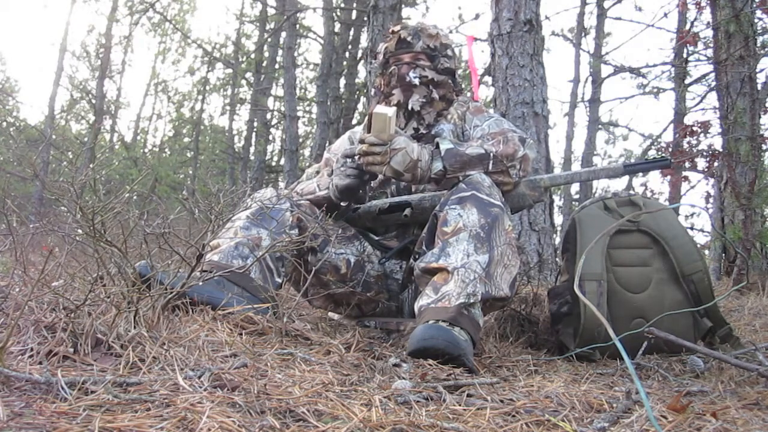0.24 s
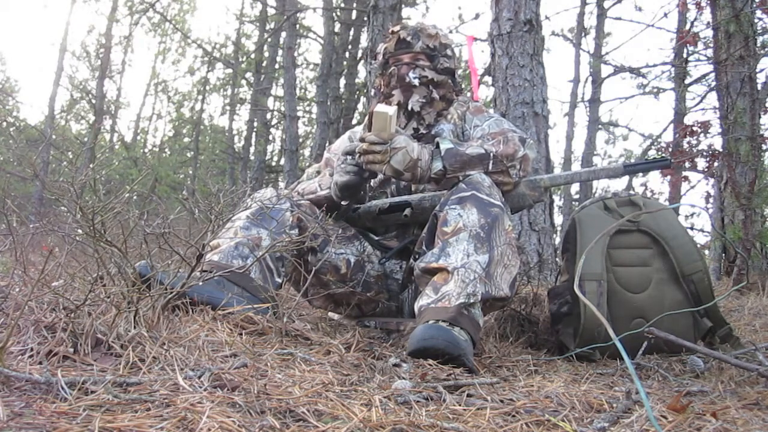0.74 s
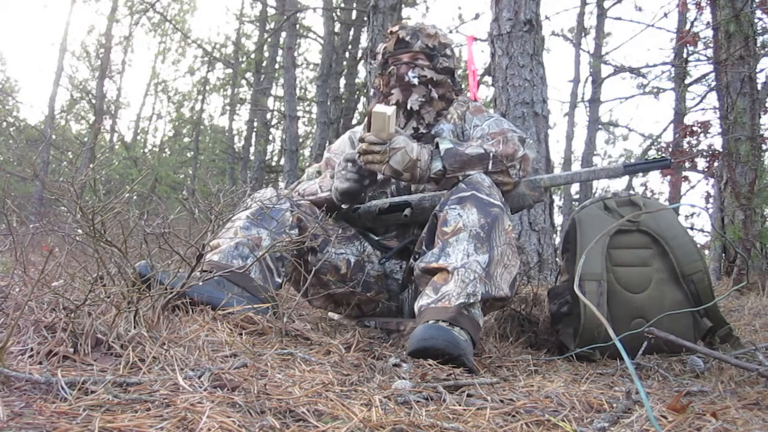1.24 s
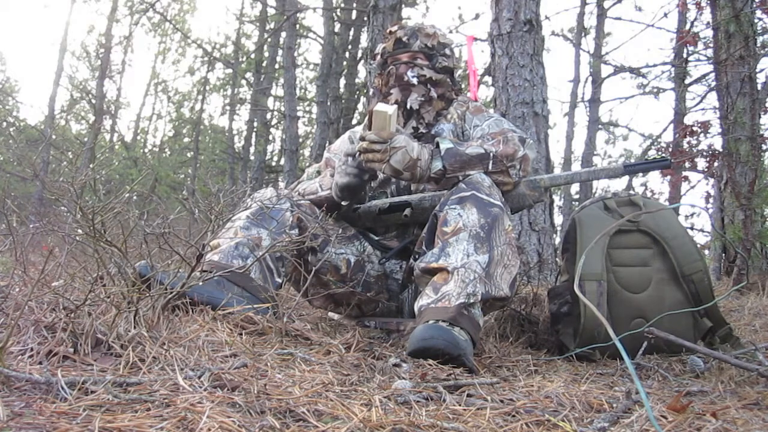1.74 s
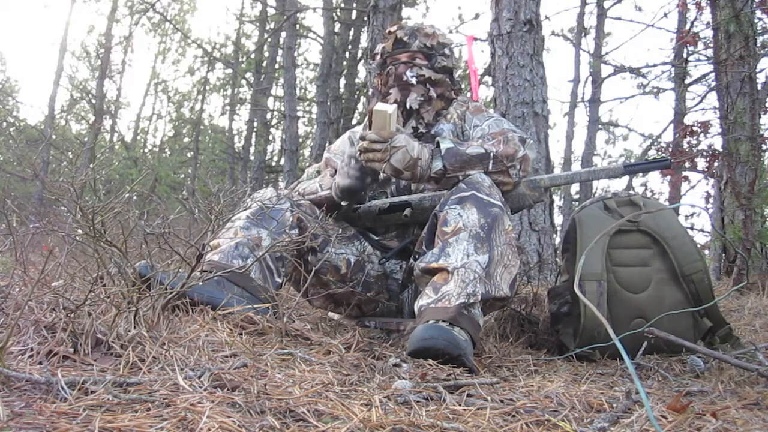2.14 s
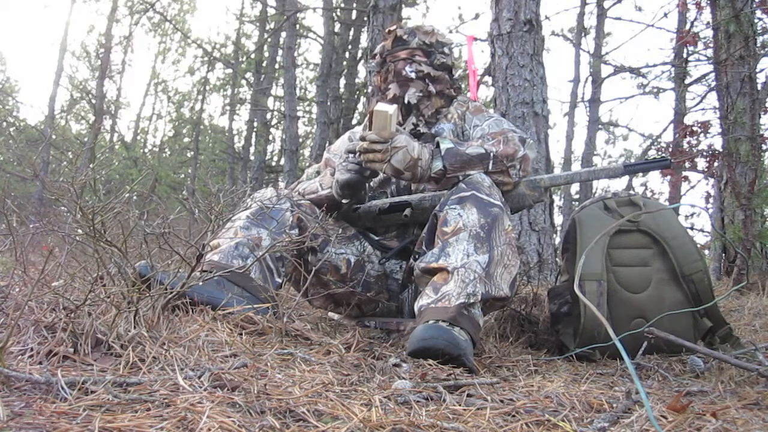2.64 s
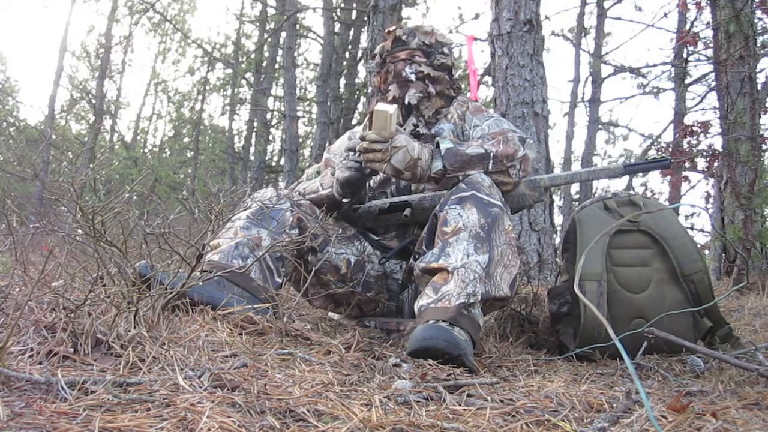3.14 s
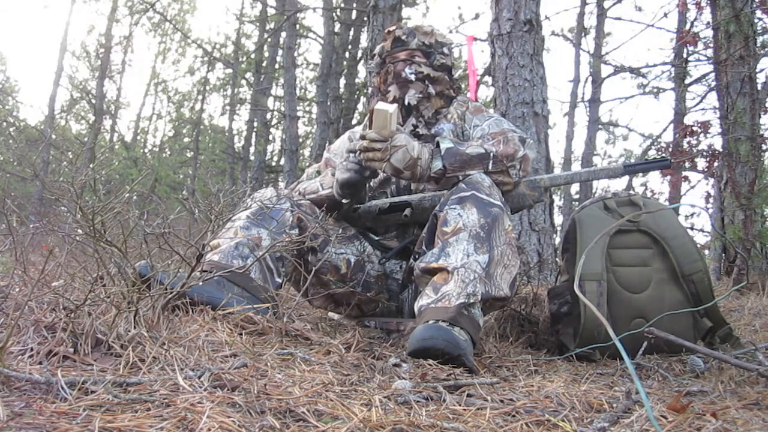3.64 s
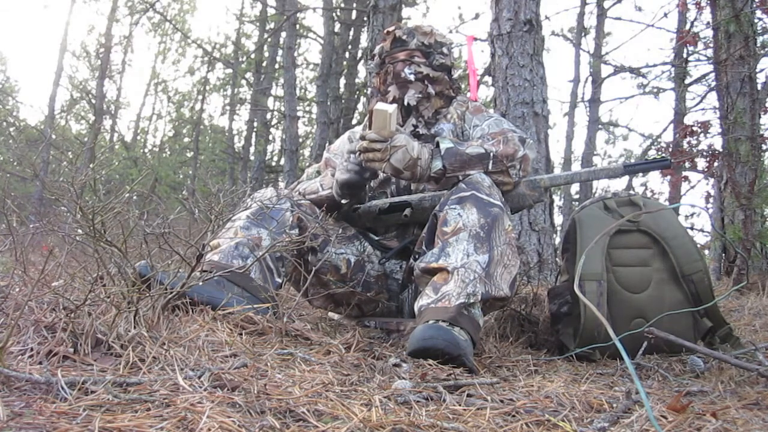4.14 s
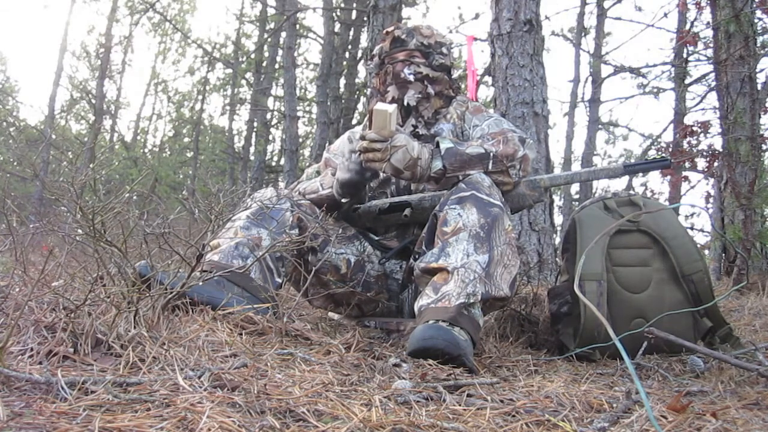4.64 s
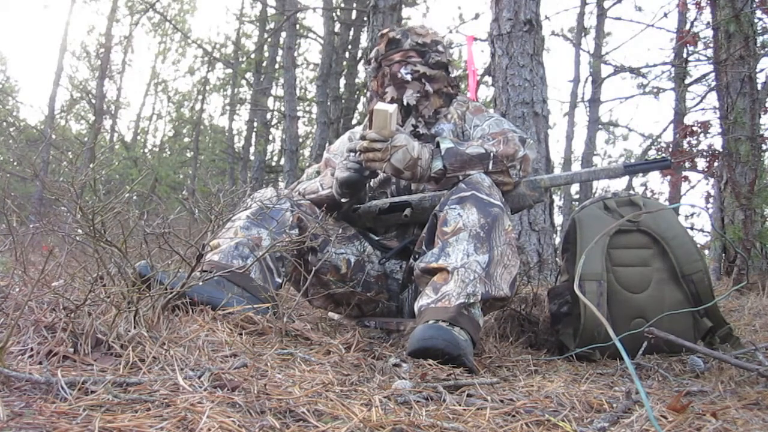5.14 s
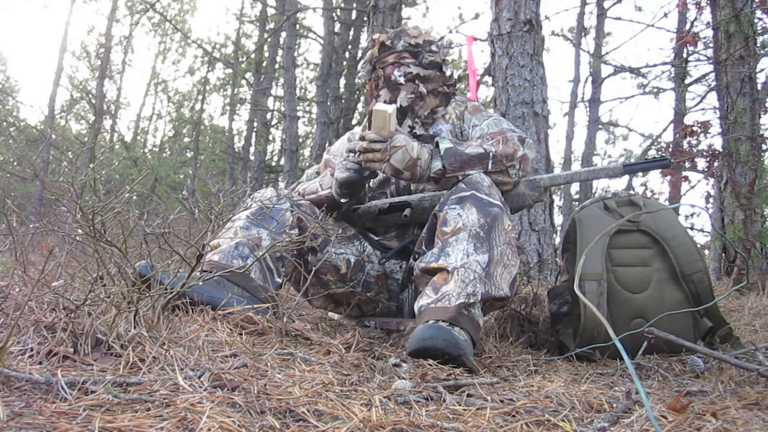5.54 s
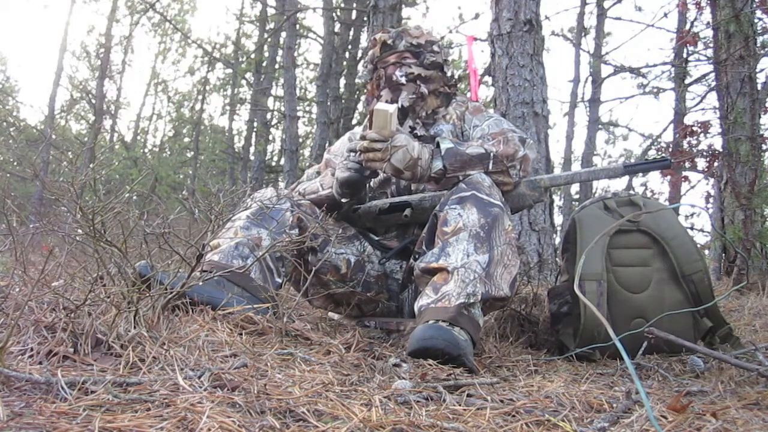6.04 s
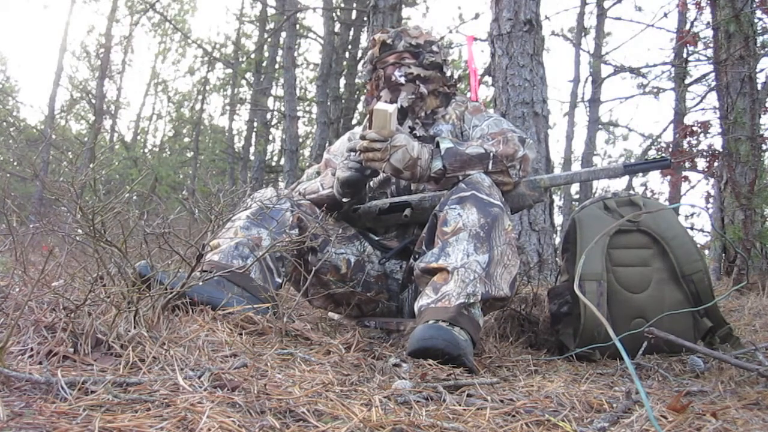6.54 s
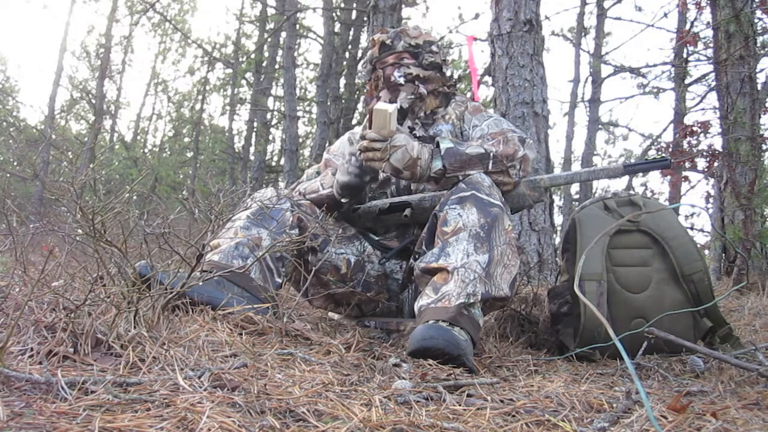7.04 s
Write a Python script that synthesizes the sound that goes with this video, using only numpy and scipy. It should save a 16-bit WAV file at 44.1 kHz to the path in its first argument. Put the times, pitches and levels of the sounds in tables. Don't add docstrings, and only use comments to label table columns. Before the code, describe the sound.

Outdoors among pines, a friction turkey call is stroked by hand: a lone dry chirp, six hollow yelps, a pause, seven brighter rhythmic yelps, a long pause, and three spaced notes. The strokes are very short, raspy and reedy, dropping slightly at the end, with a short diffuse woodland tail. A quiet mechanical whir beside the microphone and soft hiss continue throughout; a few tiny leaf ticks show in the gaps.

```python
import sys
import numpy as np
from scipy import signal
from scipy.fft import rfft, irfft
from scipy.io import wavfile

SR = 44100
rng = np.random.default_rng(int(sys.argv[2]) if len(sys.argv) > 2 else 0)


def transcribe(u):
    v = np.clip(np.atleast_2d(u).T, -1, 1)
    q = np.round(v * 32767).astype(np.int16)
    wavfile.write(sys.argv[1], SR, q)


def linear_from_db(decibels):
    return 10 ** (np.asarray(decibels, float) / 20)


N = 322371

# f/Hz, width/Hz, level/dB
HOUSING_MODES = [(1210, 82, 3), (1492, 29, 2.5), (1724, 61, -0.5), (2150, 77, -24), (2320, 28, -4.5),
                 (2800, 84, -3.5), (3470, 76, -10.5), (4570, 65, -17), (5480, 37, -10.5), (6040, 49, -10),
                 (6400, 53, -16), (7000, 20, -20.5), (6960, 380, -14), (8100, 27, -15), (8300, 100, -29),
                 (9800, 37, -42), (9900, 59, -22), (10600, 99, -29), (12200, 36, -23)]
# f/Hz, rms
# level/dB
STEADY_TONES = [(134.6, -71), (1238, -69), (1289.5, -67), (1417.3, -71), (1717.3, -69), (4747, -81),
                (8456.5, -86), (15734.3, -87)]
# centre f/Hz, rms level of a line/dB
SPLIT_TONES = [(1591.6, -69), (1878.7, -72), (2136, -77), (2453, -72), (2740, -69), (3565.5, -79),
               (5557.7, -75), (5844.8, -76), (6132.1, -73), (6419.1, -76), (6736.1, -82), (7867.2, -82),
               (9602.3, -85), (10176.6, -80), (10463.7, -86)]
# f/Hz, density/dB per Hz
AIR_SPECTRUM = [(12, -24), (20, 0.5), (277, -2.5), (897, -4.5), (1260, -12), (1370, -18), (1530, -3),
                (2020, -9.5), (2750, -8), (3070, -10.5), (4180, -14), (6180, -17.5), (7520, -22.5),
                (10500, -18), (16000, -29)]
# t/s, peak level/dB
LEAF_TICKS = [
    (0.2438, -49),
    (2.4648, -47),
    (5.8681, -48),
    (6.3036, -45),
    (6.5016, -48),
    (6.6837, -42),
]
# start t/s, length/s, swing f at the bite/Hz, share of f lost by the end/0-1, level/dB
STROKES = [(0.386, 0.038, 668.6, 0.12, -21), (1.025, 0.068, 777.6, 0.14, -21.5),
           (1.237, 0.027, 665, 0.04, -24), (1.417, 0.058, 737.4, 0.2, -22),
           (1.658, 0.049, 654.5, 0.07, -20), (1.917, 0.037, 626.5, 0.06, -23.5),
           (2.179, 0.043, 650, 0.16, -21), (3.307, 0.053, 839.6, 0.28, -18.5),
           (3.514, 0.045, 749.3, 0.19, -21), (3.722, 0.047, 734.5, 0.1, -21),
           (3.952, 0.046, 668.6, 0.16, -21.5), (4.205, 0.048, 680, .1, -20.5),
           (4.448, 0.053, 780, 0.25, -19.5), (4.694, .048, 755, 0.29, -20),
           (6.157, 0.052, 749.7, 0.07, -19), (6.721, 0.039, 743.7, 0.14, -20.5),
           (7.091, 0.041, 669, 0.08, -20)]
ROUGHNESS = [.6, .38, .5, .35, .45, .65, .45, .55, .25, .25, .5, .45, .55, .4, .25, .22, .45]
# low walls/dB, high walls/dB, bright edge/dB, small slips against big ones/0-1
BITE = [(-0.5, -4, -17, 0.86), (1.1, -2, -11.5, 0.67), (0, -2.5, -13, 0.25), (-2, -2, -8.5, 0.16),
        (1.5, -0.5, -9.5, 0.35), (2, -0.3, -9.5, 0.24), (-0.5, -0.5, -9.5, 0.2), (-6, -5, -14, 0.68),
        (-3.5, -2.5, -9.5, 0.1), (-3, -2, -10, 0), (0.3, 0, -9.5, 0.24), (-1, -2.5, -10, 0.17),
        (-3.5, -1.1, -10, 0.67), (-2, -2.5, -11, 0.47), (-6.5, -5.5, -15, 0.28), (-4.5, -4.5, -12, 0.07),
        (-1.5, -3, -11.5, 0.26)]
PUSH = [-3, -2.5, -6, -0.5, 1, -8.5, -2.5, 0.5, 1, 1.5, -0.5, 2, 1, 0, 0, 0, 1.5]
# f/Hz, width/Hz, level/dB
BOX_MODES = [(562, 75, -15.5), (780, 57, -5), (1027, 111.6, 8.5), (1313, 37, -1), (1430, 163, 5),
             (1612, 256, 2.5), (1860, 38, -36), (2221, 98, 3.5), (2545, 134, 0.5), (2985, 112, -3),
             (3267, 104, -2)]
# f/Hz, width/Hz, level/dB
EDGE_MODES = [(4245, 57, -4), (5123, 607, -0.5), (5294, 300, 3.5), (5557, 218, -4.5), (6810, 190, -9),
              (7230, 770, -13), (8600, 2300, -20), (10150, 120, -18.5), (11410, 230, -19),
              (11900, 700, -23), (13250, 400, -31), (14200, 700, -35), (15500, 270, -41)]

EASE_POWER = 4.3


def unit_rms(x):
    return x / np.sqrt(np.mean(x ** 2) + 1e-20)


def drift(rate_hz):
    pole = np.exp(-2 * np.pi * rate_hz / SR)
    noise = rng.standard_normal(N + SR)
    return unit_rms(signal.lfilter([1], [1, -2 * pole, pole * pole], noise)[SR:])


def butter(x, order, hz, kind="low"):
    return signal.sosfilt(signal.butter(order, hz, kind, fs=SR, output="sos"), x)


def resonate(x, modes, wander_db=0):
    out = 0
    wander = linear_from_db(wander_db * drift(15.4))
    for k, (hz, width_hz, db) in enumerate(modes):
        r = np.exp(-np.pi * max(width_hz, 8) / SR)
        poles = [1, -2 * r * np.cos(2 * np.pi * hz / SR), r * r]
        zeros = [(1 - r * r) / 2, 0, (r * r - 1) / 2]
        drive = x * np.roll(wander, k * SR // 3) + 1e-18
        out = out + (-1) ** k * linear_from_db(db) * signal.lfilter(zeros, poles, drive)
    return out


def motor():
    drum_hz = 29.97
    t = np.arange(N) / SR
    throb = 1 + 0.12 * np.sin(2 * np.pi * drum_hz * t)
    out = linear_from_db(-54) * unit_rms(resonate(rng.standard_normal(N) * throb, HOUSING_MODES))
    turned = t + np.cumsum(0.0001 * drift(3.46)) / SR
    flip = linear_from_db(4.5) * np.tanh(3.5 * np.cos(np.pi * drum_hz * turned))
    for tones, shape in ((STEADY_TONES, 1), (SPLIT_TONES, flip)):
        for hz, db in tones:
            tone = np.sin(2 * np.pi * (hz * turned + rng.random()))
            out += np.sqrt(2) * linear_from_db(db) * shape * tone
    return out


def air():
    hz, db = np.transpose(AIR_SPECTRUM)
    bins_hz = np.fft.rfftfreq(N, 1 / SR) + 1
    shape = linear_from_db(np.interp(np.log(bins_hz), np.log(hz), db))
    hiss = irfft(rfft(rng.standard_normal(N)) * shape, N)
    return linear_from_db(-53.5) * linear_from_db(0.45 * drift(1.5)) * unit_rms(hiss)


def leaves():
    out = np.zeros(N)
    t = np.arange(SR // 50) / SR
    for start_s, db in LEAF_TICKS:
        tick = linear_from_db(db - 14.0 - 60 * t / 0.0092) * rng.standard_normal(len(t))
        out[round(start_s * SR):][:len(t)] += tick
    return butter(out, 2, [1800, 9000], "band")


def stroke(row, t):
    start_s, length_s, swing_hz, sag, level_db = row
    done = np.clip((t - start_s) / length_s, 0, 1)
    steady = 0.3
    swing_hz = swing_hz * (1 - sag * (steady * done + (1 - steady) * done ** 3.0))
    return done, swing_hz, level_db - 7.5 * done ** EASE_POWER


def paddle():
    rest_hz, t60_s = 543, 0.068
    out = np.zeros(N)
    for row in STROKES:
        start_s, length_s = row[:2]
        t = np.arange(start_s, start_s + length_s + .08, 1 / SR)
        _, hz, level_db = stroke(row, t)
        free_s = np.maximum(t - start_s - length_s, 0)
        hz = hz + (rest_hz - hz) * np.minimum(free_s / 0.019, 1)
        level = linear_from_db(level_db - 60 * free_s / t60_s - 9)
        swell = np.clip((t - start_s) / 0.0047, 0, 1)
        swing = np.sin(2 * np.pi * np.cumsum(hz) / SR)
        out[round(start_s * SR):][:len(t)] += swell * level * swing
    return out


def slips(row, rough, edge_db, small, push_db):
    end_s = row[0] + row[1]
    t = np.arange(row[0], end_s + 0.022, 1 / SR)
    done, swing_hz, level_db = stroke(row, t)
    chance = rng.standard_normal((80, 3))
    noise = rng.standard_normal(SR // 8)[:len(t)]

    waver = np.interp(done, np.linspace(0, 1, 7), chance[-7:, 0])
    swings = np.cumsum(swing_hz * (1 + 0.015 * waver)) / SR
    k = np.arange(int(swings[-1]) + 1)
    jitter = .14 * rough * chance[k, 0] * (k > 0)
    at = np.interp(k + jitter, swings, np.arange(len(t))).astype(int)

    small_size = np.clip(small + 0.12 * done[at] ** EASE_POWER, 0, 1)
    size = np.where(k % 3 == 1, 1, small_size)
    walls, edge = np.zeros((2, len(t)))
    np.add.at(walls, at, size * linear_from_db(3.2 * rough * chance[k, 1]))
    np.add.at(edge, at, size ** 2 * linear_from_db(6.5 * rough * chance[k, 2]))

    after = signal.lfilter([1], [1, -np.exp(-1 / (0.0015 * SR))], edge)
    grit = linear_from_db(-12.5) * unit_rms(noise * (after + 0.18 * np.mean(after)))

    lift_db = -1300 * np.maximum(t - end_s + 0.0047, 0) + push_db * (done - .5)
    level = linear_from_db(level_db + lift_db)
    edge_db = edge_db - 4.5 * (1 - done) ** EASE_POWER - 7.0 * done ** EASE_POWER
    walls = level * (unit_rms(walls) + rough * grit)
    edge = level * linear_from_db(edge_db + lift_db) * (unit_rms(edge) + linear_from_db(12.0) * grit)
    return round(row[0] * SR), np.array([walls, edge])


def box_call():
    force = np.zeros((4, N))
    for row, rough, (low_db, high_db, edge_db, small), push_db in zip(STROKES, ROUGHNESS, BITE, PUSH):
        start, (walls, edge) = slips(row, rough, edge_db, small, push_db)
        t = np.arange(len(edge)) / SR
        high_db = high_db - 2 * np.exp(-t / 0.0091)
        force[:, start:start + len(edge)] += [linear_from_db(low_db) * walls, walls, linear_from_db(high_db) * walls, edge]
    wander_db = 1.7
    groups = BOX_MODES[:3], BOX_MODES[3:6], BOX_MODES[6:]
    walls = sum(resonate(f, modes, wander_db) for f, modes in zip(force, groups))
    walls = butter(walls, 4, 4730)
    sound = linear_from_db(13.5) * walls + linear_from_db(17.5) * resonate(force[3], EDGE_MODES, wander_db / 2)
    return paddle() - butter(sound, 5, 596, "high")


def trees(x):
    t = np.arange(SR // 2) / SR
    trunks = linear_from_db(-60 * t / 0.42)
    brush = linear_from_db(19.5 - 60 * t / 0.067)
    arrival = np.clip((t - .004) / 0.0048, 0, 1)
    scatter = rng.standard_normal(len(t)) * (trunks + brush) * arrival
    scatter = butter(scatter, 1, 3050, "high")
    scatter = butter(scatter, 6, 4760)
    scatter = scatter / np.sqrt(np.sum(scatter ** 2))
    return signal.fftconvolve(x, scatter)[:N] * linear_from_db(-18)


def scene():
    call = box_call()
    return (call + trees(call) + motor() + air() + leaves())[None]


def top_cut(x):
    return signal.sosfilt(signal.butter(12, 16650, fs=SR, output="sos"), x)


def record(dry):
    cut = signal.sosfilt(signal.ellip(10, .5, 33, 15780, fs=SR, output="sos"), dry)
    return top_cut(cut)


dry = scene()
out = record(dry)
transcribe(out)
```